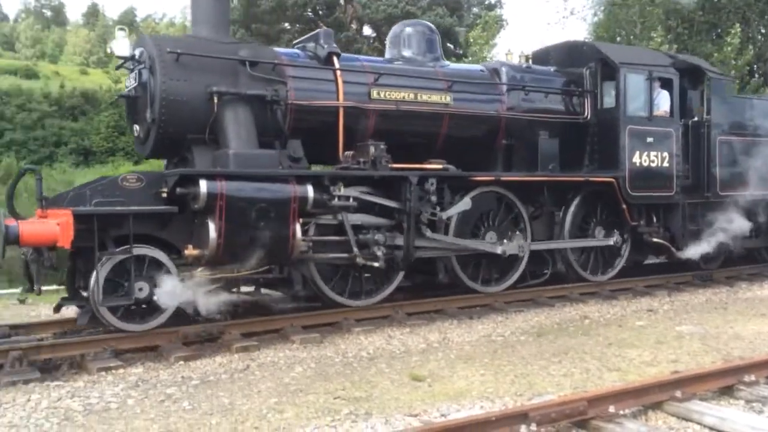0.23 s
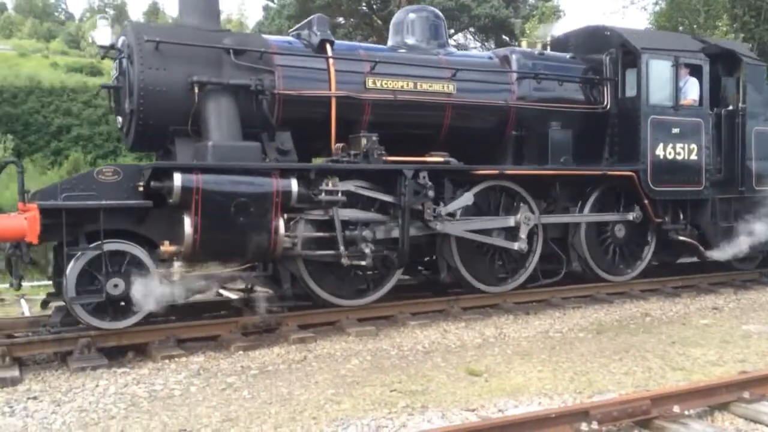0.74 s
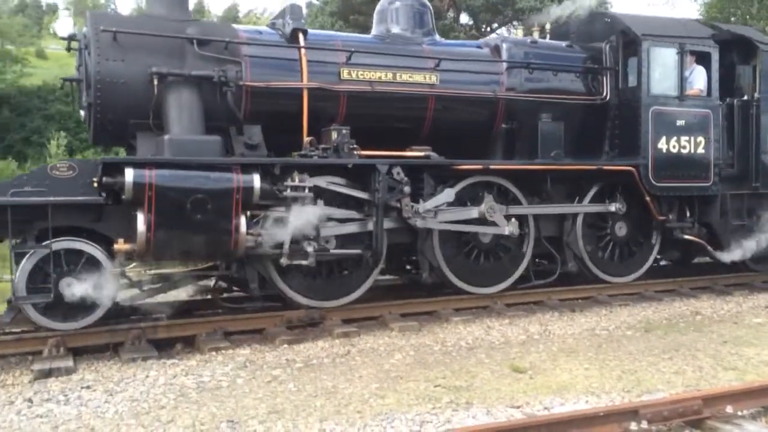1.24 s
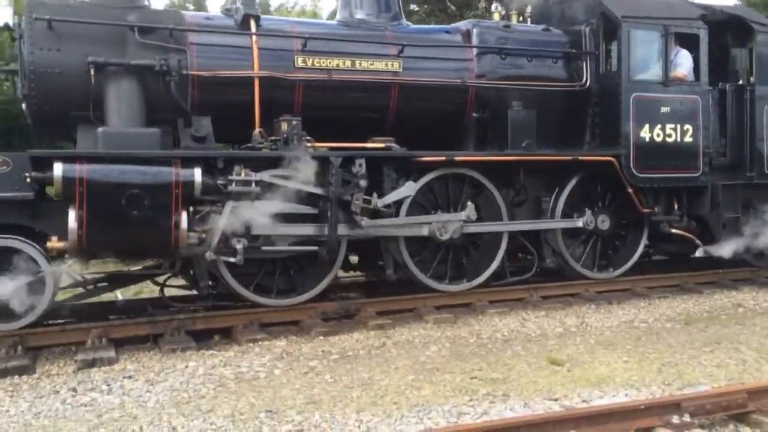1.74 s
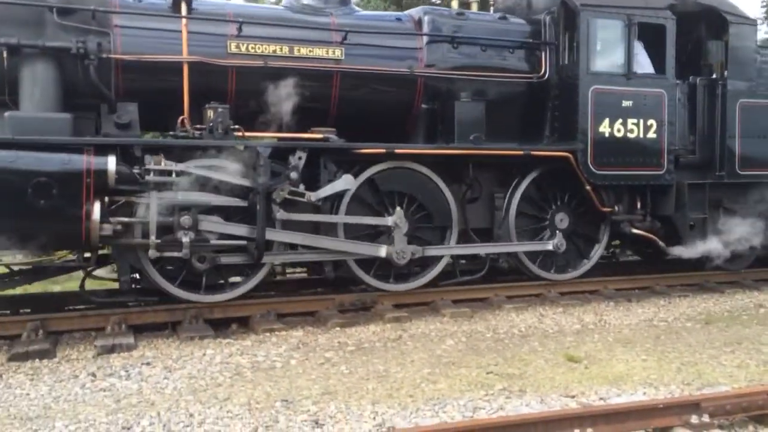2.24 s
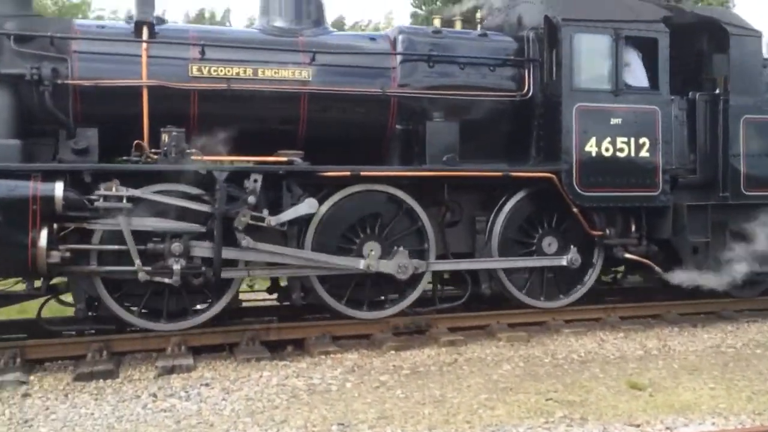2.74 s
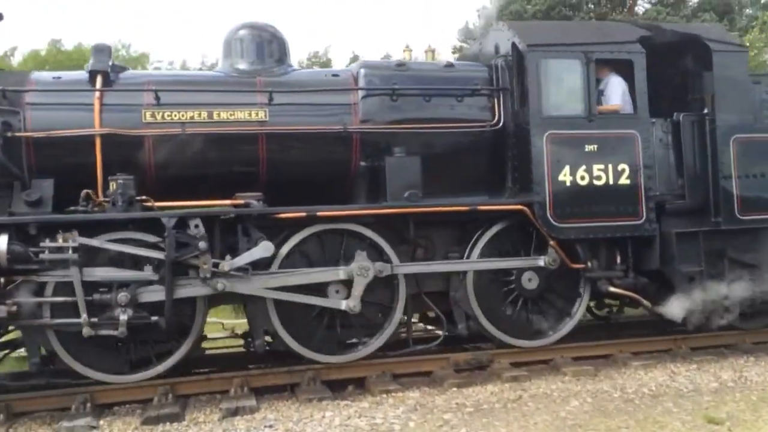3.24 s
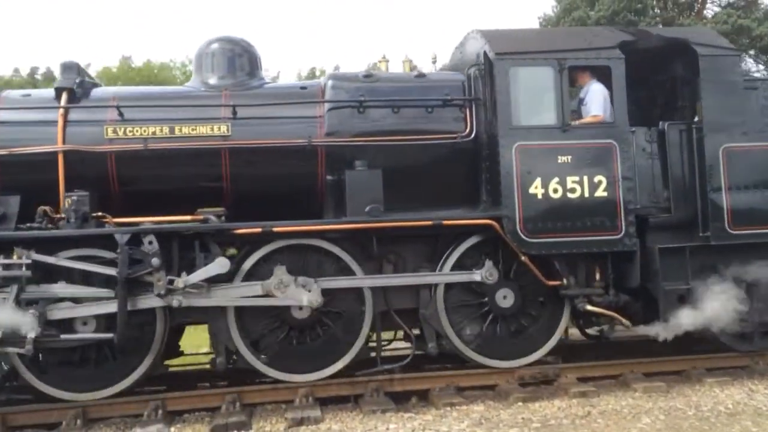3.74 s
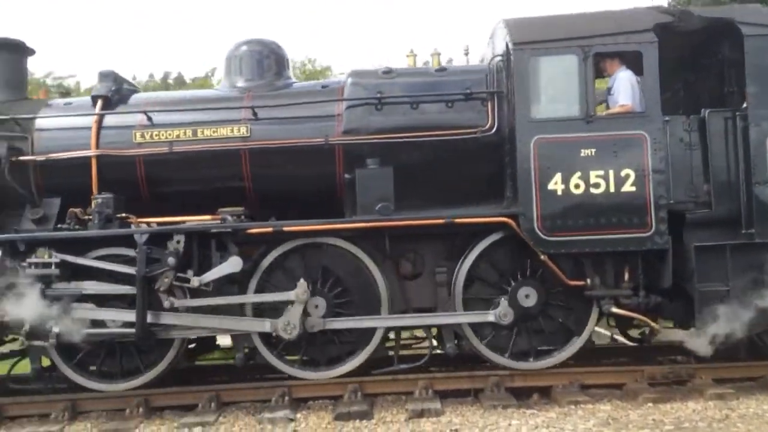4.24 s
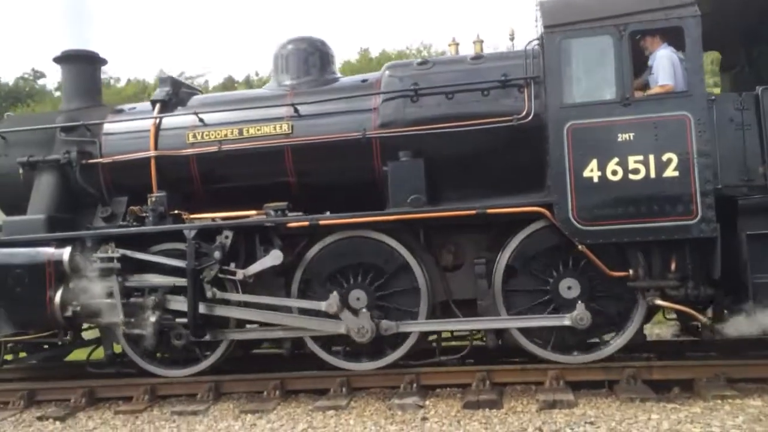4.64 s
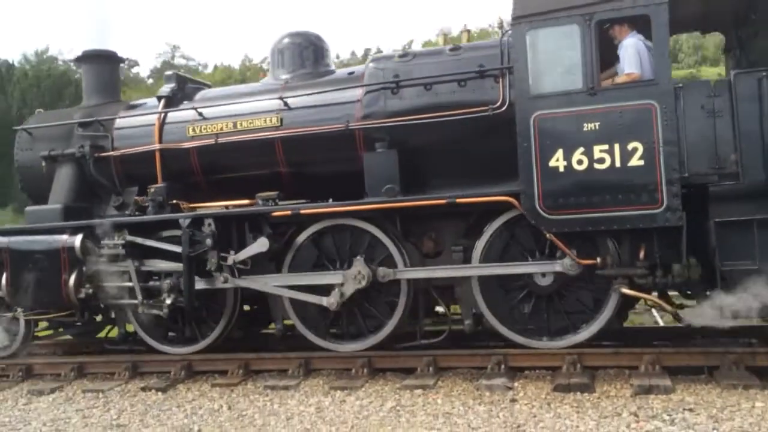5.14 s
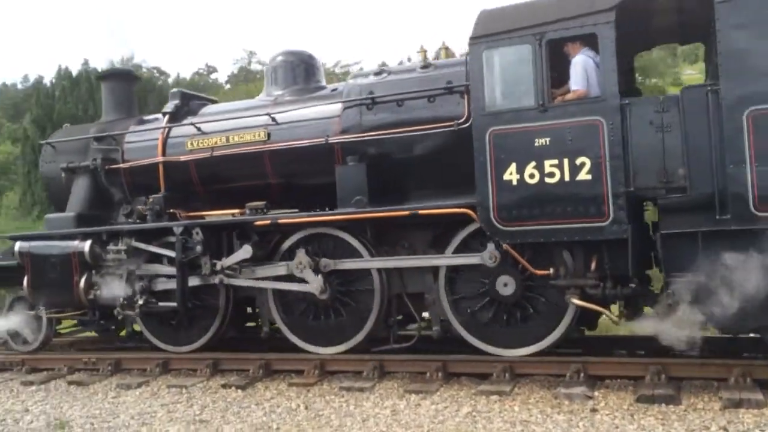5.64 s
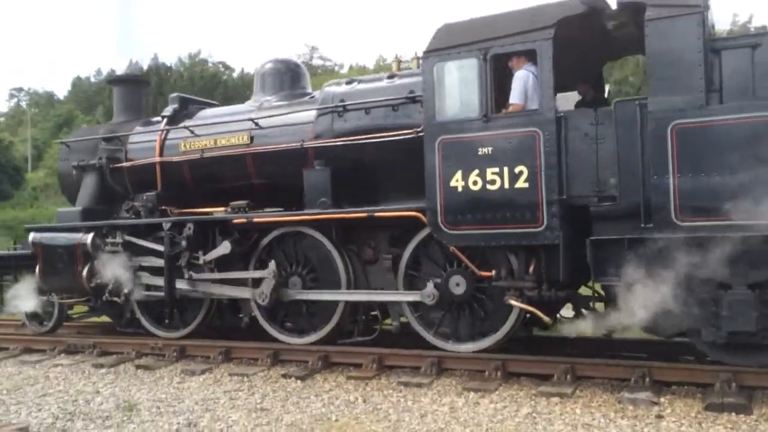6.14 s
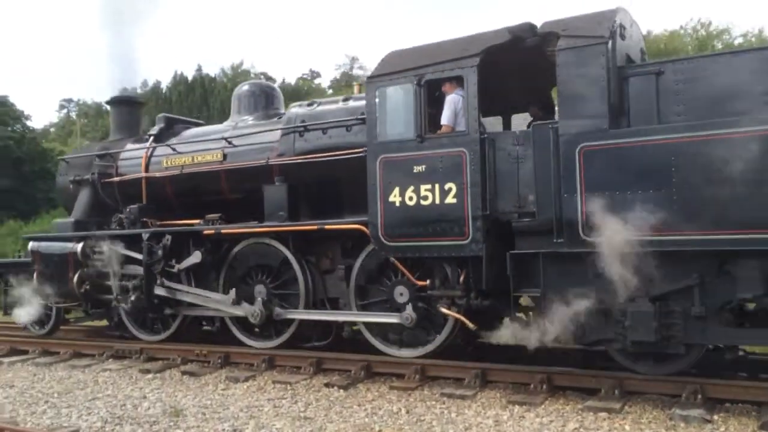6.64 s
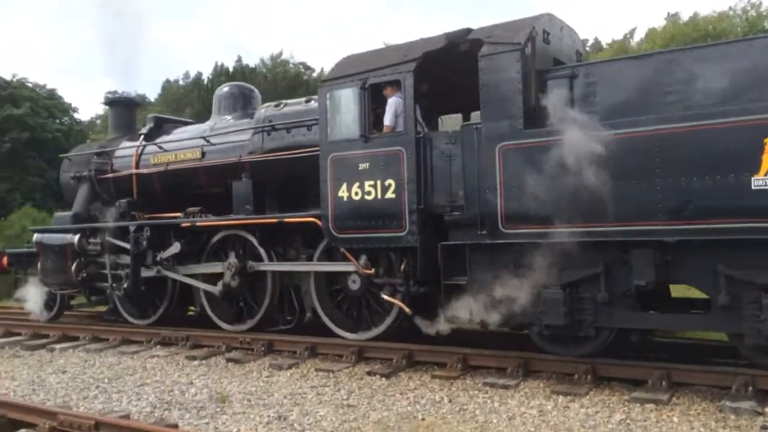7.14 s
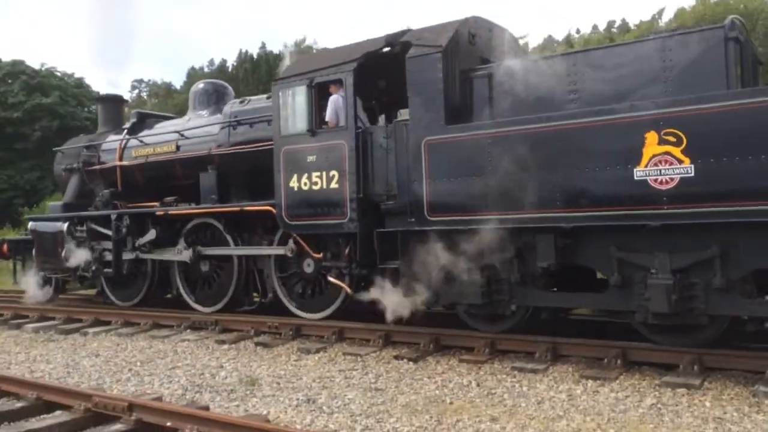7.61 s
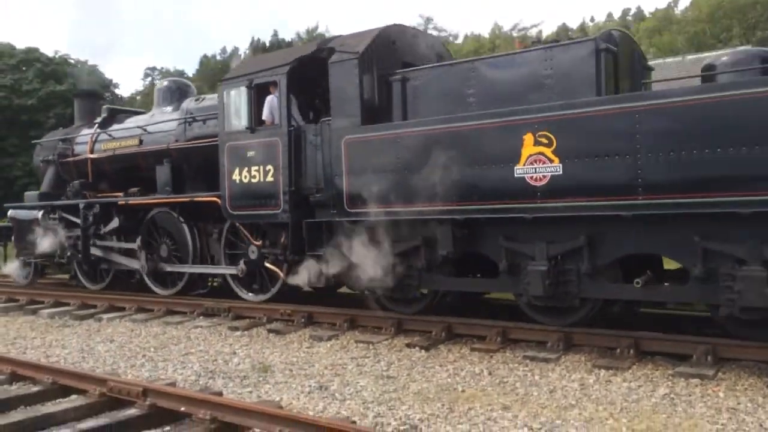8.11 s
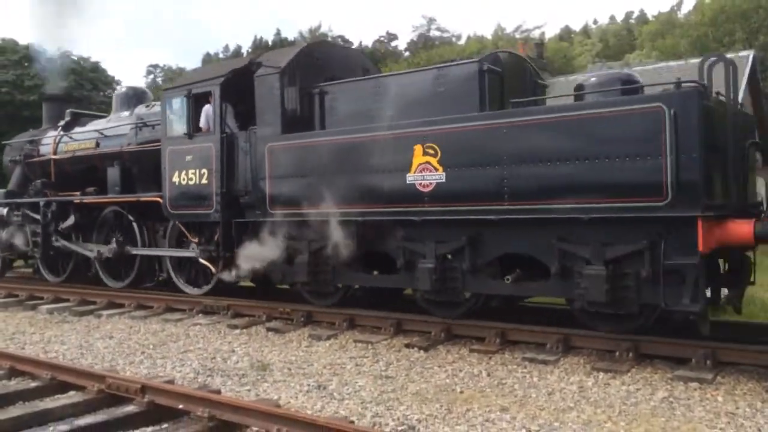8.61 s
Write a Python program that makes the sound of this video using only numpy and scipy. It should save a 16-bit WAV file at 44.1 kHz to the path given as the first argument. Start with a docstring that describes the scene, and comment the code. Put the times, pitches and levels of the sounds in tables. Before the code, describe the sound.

Slow, heavy puffs and steam hiss from a departing locomotive speed up into roaring chuffs as it rumbles past.

```python
"""A two-cylinder steam locomotive pulls away past the listener, out of doors.
At first the beat is slow: steam hisses from the leaking cylinders, then each exhaust blast makes the
chimney boom and roar. A worn joint sings, rods knock, steel squeaks, the leak whistles briefly. As the
engine passes and the beat quickens, boom and leak give way to the roar. Throughout, the train rumbles,
steam trickles under the cab and a limiter flattens the loudest peaks."""
import sys
import numpy as np
from scipy import signal
from scipy.fft import rfft, irfft, next_fast_len
from scipy.io import wavfile
from scipy.ndimage import uniform_filter1d, minimum_filter1d, map_coordinates

SR = 44100
rng = np.random.default_rng(int(sys.argv[2]) if len(sys.argv) > 2 else 0)


def dump(signal):
    """Clip the signal to [-1, 1] and save it as 16-bit WAV at the path in sys.argv[1]."""
    limited = np.clip(np.atleast_2d(signal).T, -1, 1)
    pcm = np.round(limited * 32767).astype(np.int16)
    wavfile.write(sys.argv[1], SR, pcm)


N = 391166

# Exhaust beats. Each row: valve opening in seconds, hold in seconds, boom pitch in Hz,
# relative roar level in dB, treble offset in dB.
EXHAUST_BEATS = [(0.315, .11, 197, -14.5, -16), (1.001, 0.13, 189, -20.5, -15), (1.657, .1, 186, -14, -15),
                 (2.306, 0.096, 186, -16, -13), (2.901, .11, 193.9, -17, -13.5),
                 (3.472, .11, 193.2, -21.5, -15), (3.988, 0.12, 184.9, -18.5, -13),
                 (4.52, 0.13, 188, -21.5, -11), (5.002, 0.12, 190.3, -18, -14),
                 (5.504, 0.12, 193, -17, -12.5), (5.993, 0.12, 189.4, -16.5, -12),
                 (6.484, 0.11, 204.5, -16.5, -12), (6.939, 0.11, 203.5, -16.5, -11),
                 (7.397, 0.087, 212, -15, -13), (7.835, 0.08, 201.3, -13.5, -7),
                 (8.273, .09, 210, -15.5, -10), (8.685, 0.084, 206, -14, -11.3)]
# Coughs of the jet. Each row: start in seconds, surge strength.
COUGHS = [(.391, 6), (1.063, 15), (1.703, 9), (2.33, 4.5), (2.39, 10), (2.979, 10.5), (3.543, 5),
          (4.552, 9), (5.012, 2), (6.029, 3.5), (6.508, 12)]
# Chimney notes. Each row: multiple of boom pitch, multiple of boom length, level in dB.
CHIMNEY_NOTES = [(.915, 1.03, -1), (1.08, .88, -1)]
# Cylinder leak. Each row: time in seconds, level in dB, lead on the exhaust in seconds.
LEAK_TRACK = [(.3, -38, 0.17), (2.3, -35.5, 0.12), (3.499, -37.5, 0.059), (5, -42, 0.0063),
              (8.7, -47, 0.0063)]
# Rod and coupling knocks. Each row: start in seconds, relative peak in dB, 60 dB decay in seconds.
ROD_KNOCKS = [(.565, -45, 0.045), (1.525, -16.5, 0.19), (1.856, -20, 0.15), (2.646, -26, 0.29),
              (3.721, -24, 0.092), (4.334, -34, 0.11), (5.847, -16.5, 0.051), (6.665, -25, 0.18),
              (6.876, -32, 0.13)]
# Steel squeaks and one steam whistle from the cylinder leak.
# Each row: start in seconds, end in seconds, pitch in Hz, waver in Hz, level in dB.
THIN_TONES = [(1.83, 1.9, 1700, 90, -35), (1.84, 1.91, 2270, 50, -45), (2.12, 2.33, 1545, 30, -43),
              (6.64, 6.77, 3000, 110, -52), (7.58, 8.55, 2465, 55, -53.5)]
# Ballast, boiler and cab echoes. Each row: first delay in seconds, last delay in seconds, gain in dB.
NEAR_ECHOES = [(.0058, .0085, -21), (.0135, .0105, -14), (.019, .025, -23.5)]

# Noise spectra. Each row: frequency in Hz, relative density in dB.
ROAR_NEAR_SPECTRUM = [(120, -14), (220, 6.5), (330, -10), (400, 1), (550, -12.5), (640, -5.5), (800, -12),
                      (980, -8.5), (1170, -18), (1500, -12), (2200, -25.5), (3000, -49)]
ROAR_PAST_SPECTRUM = [(120, -7), (200, 3), (270, 4), (330, -5.5), (480, -2.5), (780, -14), (920, -5.5),
                      (1200, -13), (1650, -14), (1950, -16.5), (2200, -25), (3000, -49)]
ROAR_AWAY_SPECTRUM = [(110, -24.5), (220, 1.5), (340, 2), (480, -8), (610, -3.5), (760, -11), (920, -10.5),
                      (1500, -11), (1950, -14), (2200, -26), (3000, -39)]
JET_SPECTRUM = [(1900, -46), (2300, -4), (3100, 1), (4200, -3.5), (5000, -11), (6500, -10.5), (9000, -17),
                (16000, -26)]
LEAK_SPECTRUM = [(200, 6), (500, 7.5), (1500, 1), (2300, -1.5), (4000, -1), (7000, -0.5), (10000, -3),
                 (16000, -6)]
RUMBLE_SPECTRUM = [(20, -11), (45, -9), (100, 1), (150, -5.5), (185, 6), (250, -11.5), (400, -25.5)]
GEAR_SPECTRUM = [(200, -1), (300, -1), (430, 0.5), (800, -4), (950, -2.5), (1250, -5), (1520, -2.5),
                 (2200, -8.5), (3500, -17)]
TRICKLE_SPECTRUM = [(1500, -25), (2600, -3), (4000, 1.5), (7000, 0.5), (10000, -2.5), (16000, -6)]

# Resonances. Each row: centre in Hz, width in Hz, relative gain in dB.
WHISTLE_MODES = [(1528, 10, 10), (2930, 25, -16), (3780, 28, -4), (5800, 14, -1), (6590, 83, -4.5),
                 (9070, 120, -9.5)]
ROD_MODES = [(432, 38, 16.5), (670, 150, 7), (1120, 380, 4), (1450, 92, 10), (2310, 68, -25),
             (3200, 210, -37)]
JOINT_MODES = [(2770, 10, 3), (6030, 24, -5), (9020, 90, -6)]

# Steam levels. Each row: time in seconds, level in dB.
TRICKLE_TRACK = [(0, -49.5), (2, -47.5), (4.799, -49), (6, -48.5), (8.1, -49), (8.87, -54)]
JOINT_TRACK = [(0, -66), (.7, -58), (2.2, -53), (3.5, -61), (5, -80)]

# Pairs: at the slowest beat, at the fastest.
BOOM_DB, THUMP_DB, PUNCH_DB = (-8.5, -22), (-29.5, -27), (-26.5, -34)
SPIT_DB, GEAR_DB = (-35, -48), (-49, -45)
WHISTLE_DB, DRAUGHT_DB = (-9, -9), (3, -1.5)  # relative to the leak
VALVE_SURGE = (5.5, 0.5)

ROAR_ATTACK_S, JET_ATTACK_S = 0.04, 0.048
SURGE_DELAY_S, SURGE_RISE_S, SURGE_DECAY_S = 0.0075, 0.0013, 0.039
BOOM_ATTACK_S, BOOM_OVERHANG_S, LEAK_SHUT_S = 0.013, 0.019, 0.073
BOOM_AIR_DB, RUMBLE_DB, TOP_HZ = -9.5, -41.5, 15500


def roar():
    """The jet tears out of the chimney in ragged bursts; its colour turns as the engine goes by."""
    start_s, hold_s, _, db, treble_db = np.transpose(EXHAUST_BEATS)
    end_s = start_s + hold_s - .02
    place = np.interp(clock(), [2.8, 5.6, 7.4], [0, 1, 2])
    spectra = [ROAR_NEAR_SPECTRUM, ROAR_PAST_SPECTRUM, ROAR_AWAY_SPECTRUM]
    body = sum(np.sqrt(np.clip(1 - abs(place - k), 0, 1)) * noise(spectrum)
               for k, spectrum in enumerate(spectra))
    body *= strokes(start_s + ROAR_ATTACK_S, end_s, db + 3.5, db_per_s=(950, 335), knee_s=.037)
    jet_db = db + treble_db + 1.5
    jet = noise(JET_SPECTRUM)
    jet *= strokes(start_s + JET_ATTACK_S, end_s, jet_db, db_per_s=(500, 310), knee_s=.021)
    surge = surges(start_s)
    eddies = .8 * wobble(90) + 1.5 * wobble(400)
    return reflected(body * amp(1.18 * surge + eddies) + jet * amp(1.04 * surge + .43 * eddies))


def surges(valve_s):
    """The jet swells fast and sags at each valve opening and cough."""
    out = np.zeros(N)
    for start_s, strength in [*zip(valve_s + SURGE_DELAY_S, paced(VALVE_SURGE)), *COUGHS]:
        age_s = clock() - start_s
        out += strength * np.clip(age_s / SURGE_RISE_S, 0, 1) * np.exp(-np.abs(age_s) / SURGE_DECAY_S)
    return out


def boom():
    """Each puff thumps the air and blows the chimney like a bottle: two notes beat in narrow noise."""
    start_s, hold_s, beat_hz = np.transpose(EXHAUST_BEATS)[:3]
    pitch_hz = np.interp(clock(), start_s + hold_s / 2, beat_hz)
    full_s, db = start_s + BOOM_ATTACK_S, paced(BOOM_DB)
    air = strokes(full_s, start_s + hold_s, db + BOOM_AIR_DB, db_per_s=(1800, 197), knee_s=.01)
    out = air * noise([(125, -45), (165, 6), (210, -4), (300, -17)])
    for pitch_ratio, length_ratio, note_db in CHIMNEY_NOTES:
        phase = 2 * np.pi * np.cumsum(pitch_ratio * pitch_hz * (1 + .0271 * wobble(40))) / SR
        end_s = start_s + length_ratio * (hold_s + BOOM_OVERHANG_S)
        blown = strokes(full_s, end_s, db, db_per_s=(2300, 346), knee_s=.011)
        out += amp(note_db) * blown * unit(np.sin(phase) * amp(1.9 * wobble(35)))
    bass = noise([(22, -9), (45, -17), (76, -2), (100, -10.5), (130, -4), (200, -26)])
    punch = strokes(start_s - .006, start_s, paced(PUNCH_DB), db_per_s=(1500, 900), knee_s=.003)
    thump = strokes(start_s, start_s + .12, paced(THUMP_DB), db_per_s=(800, 166), knee_s=.015)
    return out + bass * (punch + thump)


def leak():
    """Steam hisses and whistles from a cylinder each stroke, spits at the valve; the chimney hums."""
    start_s = np.transpose(EXHAUST_BEATS)[0]
    time_s, *columns = np.transpose(LEAK_TRACK)
    db, lead_s = [np.interp(start_s, time_s, column) for column in columns]
    pressure = strokes(start_s - lead_s, start_s + LEAK_SHUT_S, db, db_per_s=(248, 600), knee_s=.11)
    spit = strokes(start_s - .002, start_s + .0074, paced(SPIT_DB), db_per_s=(900, 600), knee_s=.0033)
    spit *= noise([(1500, 0), (4000, 1), (8000, -2), (16000, -14)])
    whistle = amp(gliding(WHISTLE_DB) + .4 * wobble(7.6)) * ringing(WHISTLE_MODES)
    draught = amp(gliding(DRAUGHT_DB)) * noise([(130, -32), (175, -9.5), (202, -7.5), (260, -26)])
    return spit + pressure * (noise(LEAK_SPECTRUM) + whistle + draught) * amp(1.4 * wobble(25))


def knocks():
    """Slack is taken up: a short rattle rings the heavy steel, with little treble."""
    t = clock()
    blows = sum((t >= start_s) * amp(db - 60 * np.abs(t - start_s) / t60_s)
                for start_s, db, t60_s in ROD_KNOCKS)
    return amp(-8.5) * filtered(blows * ringing(ROD_MODES), lambda hz: 1 / (1 + 1j * hz / 3000))


def rolling():
    """Wheels rumble, the gear churns harder with speed, steam trickles from a pipe under the cab."""
    jolts_db, churn_db, flutter_db = 2.2 * wobble(14), 1.2 * wobble(25), .5 * wobble(12)
    rumble = amp(RUMBLE_DB + jolts_db) * noise(RUMBLE_SPECTRUM)
    gear = amp(gliding(GEAR_DB) + churn_db) * reflected(noise(GEAR_SPECTRUM))
    trickle_db = np.interp(clock(), *np.transpose(TRICKLE_TRACK))
    return rumble + gear + amp(trickle_db + flutter_db) * noise(TRICKLE_SPECTRUM)


def thin_tones():
    """Faint wavering tones: steel squeaks and one brief steam whistle from the cylinder leak."""
    t = clock()
    out = np.zeros(N)
    for start_s, end_s, hz, waver_hz, db in THIN_TONES:
        gate = np.clip(np.minimum(t - start_s, end_s - t) / .027, 0, 1)
        tone = np.sin(2 * np.pi * np.cumsum(hz + waver_hz * wobble(220)) / SR)
        out += gate * amp(db + 2.4 * wobble(23)) * tone
    return out


def joint():
    """Steam sings thinly through a worn joint and fades as the cylinders pass."""
    db = np.interp(clock(), *np.transpose(JOINT_TRACK))
    return amp(db + .87 * wobble(13)) * ringing(JOINT_MODES)


def reflected(x):
    """Close surfaces add weak copies; their comb slides as the engine moves."""
    t = clock()
    return x + sum(amp(db) * map_coordinates(x, [(t - np.linspace(first_s, last_s, N)) * SR], order=3)
                   for first_s, last_s, db in NEAR_ECHOES)


def trees(x, wet_db, t60_s, dull_hz):
    """The wooded bank scatters back a faint, dull tail."""
    t = np.arange(SR // 2) / SR
    tail = rng.standard_normal(len(t)) * amp(-60 * t / t60_s) * np.clip(t / .098, 0, 1)
    wet = signal.fftconvolve(x, tail / np.linalg.norm(tail))[:N]
    return amp(wet_db) * filtered(wet, lambda hz: hz / (hz + 250) / (1 + 1j * hz / dull_hz))


def strokes(starts_s, ends_s, levels_db, db_per_s, knee_s):
    """Gain of strokes held from start to end, with (rise, fall) slopes and rounded corners."""
    t = clock()[::20]
    rise, fall = db_per_s
    ramp = lambda lag_s: np.hypot(np.maximum(lag_s, 0), knee_s) - knee_s
    gain = sum(amp(db - rise * ramp(start_s - t) - fall * ramp(t - end_s))
               for start_s, end_s, db in zip(starts_s, ends_s, levels_db))
    return np.interp(clock(), t, gain)


def paced(slow_fast):
    """One value per beat, from slow to fast as the beat rate rises."""
    slow, fast = slow_fast
    rate_hz = 1 / np.gradient(np.transpose(EXHAUST_BEATS)[0])
    pace = np.clip((rate_hz - rate_hz.min()) / np.ptp(rate_hz), 1e-6, 1) ** 1.4
    return slow + (fast - slow) * pace


def gliding(slow_fast):
    """Paced values, interpolated per sample."""
    return np.interp(clock(), np.transpose(EXHAUST_BEATS)[0], paced(slow_fast))


def noise(spectrum):
    """Noise of rms 1 coloured by (Hz, dB) points."""
    points_hz, db = np.transpose(spectrum)
    response = lambda hz: amp(np.interp(np.log(hz + 1), np.log(points_hz), db, left=-120, right=-120))
    return unit(filtered(rng.standard_normal(N), response))


def ringing(modes):
    """Resonances stirred by turbulence, rms 1."""
    response = lambda hz: sum(amp(db) * 1j * hz * width_hz / (mode_hz**2 - hz**2 + 1j * hz * width_hz)
                              for mode_hz, width_hz, db in modes)
    return unit(filtered(rng.standard_normal(N), response))


def wobble(rate_hz):
    """Smooth random curve through rate_hz knots a second."""
    t = clock()
    knots = rng.standard_normal(int(N * rate_hz / SR) + 4)
    return np.interp(t, t[::10], map_coordinates(knots, [t[::10] * rate_hz]))


def filtered(x, response):
    """x through a complex frequency response."""
    size = next_fast_len(N + SR // 2)
    return irfft(rfft(x, size) * response(np.fft.rfftfreq(size, 1 / SR)), size)[:N]


def amp(db):
    """Decibels to gain."""
    return 10 ** (np.asarray(db) / 20)


def unit(x):
    """Scale to rms 1."""
    return x / np.sqrt(np.mean(x ** 2) + 1e-20)


def clock():
    """Sample times in seconds."""
    return np.arange(N) / SR


def limiter(x, ceiling, hold_s):
    """Gain ducks ahead of each peak and recovers fast."""
    size = int(hold_s * SR)
    needed = np.minimum(1, ceiling / (np.abs(x) + 1e-9))
    return x * uniform_filter1d(minimum_filter1d(needed, size), size)


def scene():
    """Trackside mix, mono."""
    blast = roar()
    exhaust = boom() + blast + trees(blast, wet_db=-24.5, t60_s=.5, dull_hz=1800)
    return (exhaust + leak() + rolling() + joint() + thin_tones() + knocks())[None]


def record(dry):
    """Limit the blasts; cut everything above TOP_HZ."""
    limited = limiter(dry[0], ceiling=.69, hold_s=.012)
    return filtered(limited, lambda hz: hz < TOP_HZ)[None]


dry = scene()
out = record(dry)
dump(out)
```